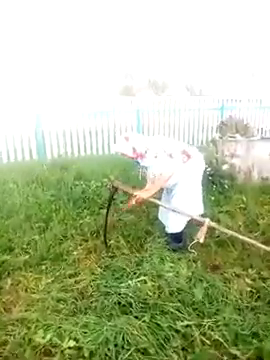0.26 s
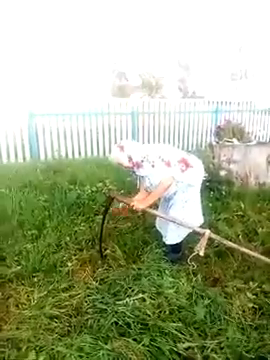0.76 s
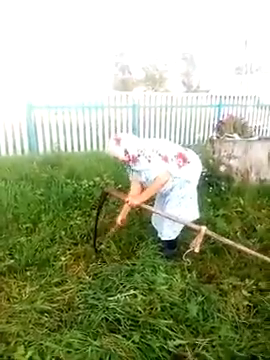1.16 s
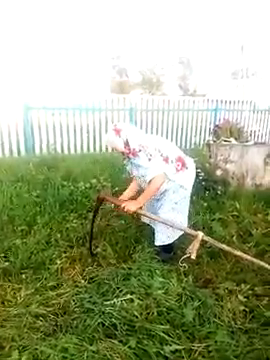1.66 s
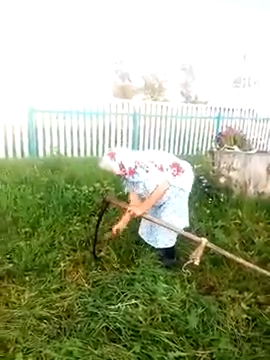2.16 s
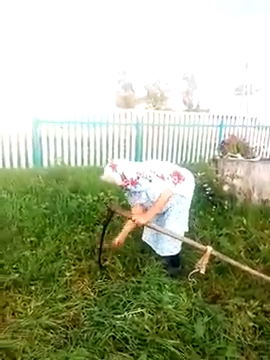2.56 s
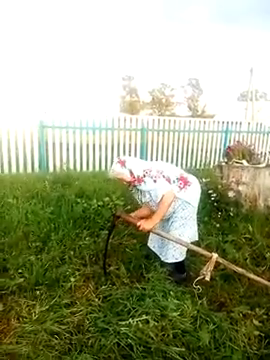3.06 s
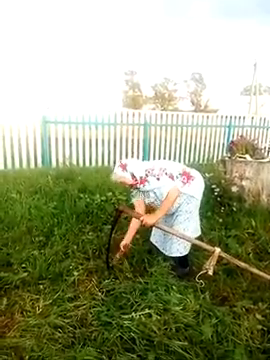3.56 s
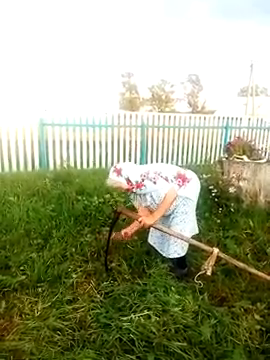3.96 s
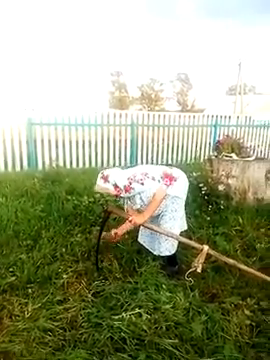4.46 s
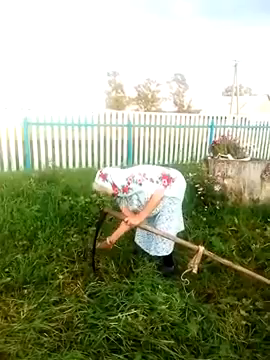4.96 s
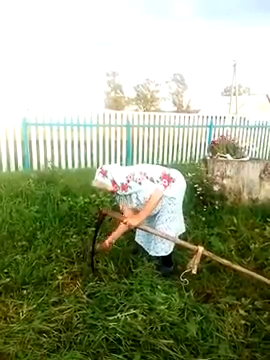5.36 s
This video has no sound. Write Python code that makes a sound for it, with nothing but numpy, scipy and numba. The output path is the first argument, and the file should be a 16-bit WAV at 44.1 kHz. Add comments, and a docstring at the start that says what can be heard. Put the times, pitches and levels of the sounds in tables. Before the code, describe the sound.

A whetstone sharpens a scythe blade in a quiet yard, a few metres away. From the very start, strokes come about every half second: the stone clacks onto the steel, sometimes bounces, then rasps along the edge with a gritty, slightly squeaky hiss and flicks off. The blade is damped by hand, so it rings only briefly. Stronger clacks land at about 1 and 2 seconds, and the loudest at 2.5. A few small dry knocks come around 1.3 seconds. The strokes continue, with clear clinks at about 3.1 and 4 seconds and a soft low thud near 4.5. After that the strikes are lighter and the scrapes follow more closely until the end at about 5.6 seconds. Faint dry rustles fill some gaps as the hand moves back. A low outdoor rumble and a soft distant wash lie underneath throughout.

```python
"""Honing a scythe

In a quiet yard, a few metres away, a whetstone clacks onto a scythe standing on its shaft, bounces,
then rasps along the edge and flicks off. Its grit rings the hand-damped blade, squeaks and hisses.
Between strokes come a faint rustle and the odd knock, over a low outdoor rumble and a distant wash."""
import sys
import numpy as np
from scipy import signal
from scipy.fft import rfft, irfft
from scipy.io import wavfile
from numba import njit

SR = 44100
rng = np.random.default_rng(int(sys.argv[2]) if len(sys.argv) > 2 else 0)


def transcribe(u):
    """Save the signal u as a 16-bit wav file named by the first command-line argument.

    u: samples, shape (n,) or (channels, n), limited to [-1, 1]; the rate is SR.
    q: integer samples, one column per channel.
    """
    v = np.clip(np.atleast_2d(u).T, -1, 1)
    q = np.round(v * 32767).astype(np.int16)
    wavfile.write(sys.argv[1], SR, q)


N = 247401
T = np.arange(N) / SR

# stone hits steel, and at 2.5635 s a faint repeat of the hit just before: (time [s], relative level [dB], main
# resonance [Hz], brightness [dB/octave], ring length [factor], shaft knock against the steel [dB])
STONE_HITS = [(0.001, -24, 2050, 3, 1.7, -16), (0.5195, -29, 1980, 3, 1.7, -11.5),
              (0.5452, -36, 1980, -2, 1.2, -13), (0.9797, -17.5, 2130, -2.5, 1.5, -20),
              (1.0223, -36, 2100, -3, 1.2, -22), (1.0445, -39, 2070, 7, 0.92, -20),
              (1.5055, -30, 1990, 0, 1.7, -14), (1.999, -15.6, 2090, .8, 1.07, -18),
              (2.5379, -11.2, 2087, 0, 0.91, -21.5), (2.5635, -30.5, 2100, 5, 1.1, -16),
              (3.13, -25.3, 1860, -5, 1, -10), (3.1491, -29.5, 2060, -7, 1.8, -19),
              (3.4235, -41, 2100, 6, 1.1, -18), (3.9913, -22, 2110, -5.5, 0.89, -22),
              (4.052, -33.5, 2100, 3, 1, -22), (4.5654, -29.5, 2110, -5, 1.5, -13.5),
              (5.4055, -38, 2080, 3, 1.4, -20)]
# stone drawn along the edge: (start [s], flick [s], rise [s], build-up to the flick [s], fall [s],
# time to full speed [s], base level [dB], boost at the flick [dB], hiss level [dB],
# relative grind [dB], brightness [dB/octave], main resonance [Hz])
STONE_STROKES = [(0.016, 0.179, .008, .008, .014, .18, -52.5, 9, -53, -23, .5, 2050),
                 (0.556, 0.6975, .07, .006, .015, .08, -47, 5.5, -62, -15, .3, 2000),
                 (1.018, 1.211, .02, .014, .013, .18, -53, 8, -56, -22, 1.2, 2060),
                 (1.521, 1.533, .006, .008, .01, .01, -54, 2, -65.5, -15, -1, 2000),
                 (1.565, 1.637, .035, .02, .024, .06, -41.5, 5.5, -55, -15, -.5, 2000),
                 (2.010, 2.179, .008, .012, .016, .09, -50, 6, -59, -16, 1.3, 2050),
                 (2.560, 2.775, .01, .012, .028, .05, -50, 4, -61, -18, .5, 2070),
                 (3.146, 3.179, .006, .008, .009, .01, -51, 3, -62, -12, -2, 2060),
                 (3.350, 3.611, .035, .035, .018, .055, -50, 5.5, -59.8, -14, .2, 2060),
                 (4.003, 4.2625, .02, .004, .052, .08, -52.5, 3.5, -61, -20, 0, 2080),
                 (4.575, 4.7545, .03, .008, .056, .1, -53, 5, -61, -24, -2.3, 2100),
                 (4.950, 5.032, .018, .03, .085, .06, -54, 5, -61.5, -18, 0, 2110),
                 (5.105, 5.216, .008, .05, .08, .02, -59, 11, -63, -19, -1.5, 2100),
                 (5.335, 5.597, .06, .006, .04, .1, -51.5, 1, -61, -21, -1.8, 2070)]
# blade damped by hand and stone: (nominal pitch [Hz], nominal width [Hz], level [dB])
DAMPED_MODES = [(1430, 150, -25), (1590, 70, -20.5), (1820, 70, -18), (2060, 135, .5), (2260, 180, -4.2),
                (2630, 150, -17), (3190, 200, -11), (3380, 80, -5.3), (3840, 160, -6.5), (4300, 150, -16.5),
                (4530, 70, -7), (4960, 200, -13.5), (5350, 170, -21.5), (6150, 200, -16),
                (6570, 150, -11.5), (7560, 260, -18), (8660, 380, -20), (9950, 380, -19), (11240, 380, -19),
                (11880, 260, -16), (14800, 800, -25)]
# blade ringing on after the stone leaves: (pitch [Hz], 60 dB decay [s], relative level [dB])
FREE_MODES = [(2085, .1, -24), (3376, .26, -14), (3844, .18, -16), (4527, .2, -13), (5100, .2, -18),
              (6578, .14, -17), (7637, .22, -15), (9374, .12, -15), (11957, .08, -14)]
# light brushing as the hand comes back: (middle [s], half length [s], level [dB])
HAND_BRUSHES = [(.74, .03, -58), (.848, .04, -54.5), (2.39, .07, -59.5), (2.94, .045, -58),
                (3.075, .02, -63), (3.22, .04, -62), (3.33, .06, -60), (3.93, .08, -63), (4.86, .035, -63)]
# small dry knocks: (time [s], peak level [dB], decay [s])
DRY_TICKS = [(1.2722, -28.5, .001), (1.2775, -40.5, .004), (1.318, -50, .004), (1.351, -51, .004)]
# soft low thuds: (time [s], level [dB], pitch [Hz], decay [s])
SOFT_THUDS = [(1.318, -45, 480, .005), (1.351, -46, 400, 0.0041), (4.463, -37, 190, 0.0042)]

# EQ curves, each (frequency [Hz], gain [dB])
AIR_EQ = [(15, -13), (35, -11.5), (58, -4), (68, -2.5), (76, 7.5), (86, 1), (100, .5), (160, -1.5),
          (300, -5.5), (480, -10), (800, -14.5), (1250, -19), (2000, -20), (2800, -21.5), (6500, -25),
          (15500, -28.5)]  # outdoor rumble and thin hiss
WASH_EQ = [(200, -17), (450, -2.5), (750, 1), (1000, -2), (1300, -9), (1900, -8), (3000, -16), (6000, -36)]  # distant midrange wash
CONTACT_EQ = [(1000, 0.5), (4500, -0.5), (6500, -4.5), (9000, -3), (15500, -7)]  # force of stone striking steel
RASP_EQ = [(300, -17), (700, -7), (1250, -7.5), (2000, 0), (2900, 0), (4000, -2), (5600, -2), (7000, -5.5),
           (9000, -7.5), (15500, -20.5)]  # broad scrape of grit
SHAFT_EQ = [(150, -12), (400, -5), (650, 0.5), (900, -6), (1150, 2), (1500, -7), (2200, -15.5), (5000, -25)]  # wooden body of the shaft
HISS_EQ = [(5000, -17), (7500, -3), (8900, 2), (9600, .5), (10100, 3), (10700, 0), (11400, 0), (11900, 4),
           (12400, -5), (13800, -1), (14150, 2), (14600, -4), (15200, -3), (15500, -6)]  # fine sizzle on the edge
GRIND_EQ = [(200, -9), (600, -1), (1050, -1), (1300, -4), (1600, 7), (1900, 2), (2600, 2), (5000, -20.5)]  # coarse, lower grinding
RUSTLE_EQ = [(600, -8), (1800, 1), (3000, -7), (6000, -2), (9000, 1.5), (11500, 3), (13500, -2),
             (15500, -4)]  # airy brush of the hand
TICK_EQ = [(100, -11), (500, -6), (900, 2), (1500, 1), (2300, -5), (3100, -19), (6000, -40)]  # small dry knock
MICROPHONE_EQ = [(20, 0), (6700, 0), (8000, -10.5), (13900, -10.5), (14600, -0.5), (15500, -1)]  # microphone with an upper-treble dip

BLADE_HZ = 2060  # the blade's main resonance, unbent


def undb(db):
    """Decibels to gain."""
    return 10 ** (np.asarray(db) / 20)


def unit(x):
    """Scale to rms 1."""
    return x / np.sqrt(np.mean(x ** 2))


def add(out, start_s, x):
    """Mix x into out at start_s."""
    i = max(int(start_s * SR), 0)
    out[i:i + len(x)] += x[:N - i]


def colour(x, curve, size=4096):
    """Minimum-phase EQ along a curve of (frequency [Hz], gain [dB])."""
    hz, db = np.transpose(curve)
    log_hz = np.log(np.fft.rfftfreq(size, 1 / SR) + 1)
    log_gain = np.log(undb(np.interp(log_hz, np.log(hz), db)))
    cepstrum = irfft(log_gain)[:size // 2]
    cepstrum[0] /= 2
    response = irfft(np.exp(rfft(2 * cepstrum, size)))
    return signal.fftconvolve(x, response)[:len(x)]


@njit
def resonate(x, hz, width_hz):
    """Sweepable band-pass, gain 1 at the centre."""
    y, band_state, low_state = np.empty(len(x)), 0., 0.
    for i in range(len(x)):
        g, damping = np.tan(np.pi * hz[i] / SR), width_hz / hz[i]
        band = (band_state + g * (x[i] - low_state)) / (1 + g * (g + damping))
        band_state, low_state = 2 * band - band_state, low_state + 2 * g * band
        y[i] = damping * band
    return y


def drift(rate_hz):
    """Random modulation with a spread near 1."""
    knots = np.arange(0, N / SR + 1, 1 / rate_hz)
    return np.interp(T, knots, rng.standard_normal(len(knots)))


def outdoor_air(wash_peak_s=.65, rise_db_per_s=8, fade_db_per_s=1.6):
    """A bed of rumble and even hiss; a distant wash swells, then slowly dies down."""
    rumble = undb(-56 + .36 * drift(3)) * unit(colour(rng.standard_normal(N), AIR_EQ, size=16384))
    swell_db = np.minimum(rise_db_per_s * (T - wash_peak_s), fade_db_per_s * (wash_peak_s - T))
    wash = undb(-60 + swell_db + .8 * drift(5)) * unit(colour(rng.standard_normal(N), WASH_EQ))
    return rumble + wash


def smeared_click(spread_s, size=4096, bands=36):
    """Bending waves of each pitch arrive at their own time, smearing a click over milliseconds."""
    hz = np.fft.rfftfreq(size, 1 / SR)
    delay_s = spread_s * np.interp(hz, np.linspace(0, SR / 2, bands), rng.uniform(.16, 1, bands))
    return irfft(np.exp(-2j * np.pi * np.cumsum(delay_s) * SR / size))


def blade(force, main_hz, tilt_db, ring, flutter_db=0):
    """Steel modes of alternating sign: contact bends the low ones most; sliding makes each flutter."""
    out = 0
    for k, (hz, width_hz, db) in enumerate(DAMPED_MODES):
        bend = (main_hz / BLADE_HZ) ** (1 if hz < BLADE_HZ * np.sqrt(2) else .15)
        gain = undb(db + tilt_db * np.log2(hz / BLADE_HZ))
        push = force * undb(flutter_db * drift(60)) if flutter_db else force
        out += (-1) ** k * gain * resonate(push, hz * bend * np.ones(len(force)), width_hz / ring)
    return out


def clacks(hits, smear_s=.0019, chatter_s=.0032, crack_s=.0053, shaft_s=.0093):
    """A sharp blow and brief chatter ring the steel; the wooden shaft answers with a dull knock."""
    out = np.zeros(N)
    for time_s, db, main_hz, tilt_db, ring, shaft_db in hits:
        blow = smeared_click(smear_s * ring)  # a loosely held blade smears the blow more
        t, noise = T[:len(blow)], rng.standard_normal((3, len(blow)))
        chatter = noise[0] * t * np.exp(-t / chatter_s)
        # a stone already sliding tears over the steel rather than striking it
        sliding = any(start < time_s <= flick for start, flick, *_ in STONE_STROKES)
        chatter *= (1.3 if sliding else .35) / np.linalg.norm(chatter)
        force = colour(blow + chatter, CONTACT_EQ)
        steel = unit(blade(force, main_hz, tilt_db, ring))
        crack = unit(colour(noise[1] * np.exp(-t / crack_s), RASP_EQ))
        shaft = unit(colour(noise[2] * np.exp(-t / shaft_s), SHAFT_EQ))
        add(out, time_s, undb(db - 21) * (steel + undb(-19) * crack + undb(shaft_db) * shaft))
    return out


def free_ring(steel):
    """Away from the hand, the blade rings on faintly at a few pitches."""
    return sum(undb(db + 6) * resonate(steel, np.full(N, float(hz)), np.log(1000) / np.pi / t60_s)
               for hz, t60_s, db in FREE_MODES)


def yard_reverb(x, t60_s=.28, tail_db=-18, echo_s=.0275, echo_spread_s=.0034, echo_db=-21):
    """The yard returns a thin diffuse tail and a weak scattered slap."""
    t = T[:SR // 2]
    tail = rng.standard_normal(len(t)) * np.exp(-np.log(1000) * t / t60_s)
    echo = rng.standard_normal(len(t)) * np.exp(-np.abs(t - echo_s) / echo_spread_s)
    response = undb(tail_db) * tail / np.linalg.norm(tail) + undb(echo_db) * echo / np.linalg.norm(echo)
    return signal.fftconvolve(x, response)[:N]


def hand_motion(bite_db=3.5, bite_s=.03, waver_db=.8):
    """Stroke envelopes: the stone bites as it settles, speeds up, presses into the flick and lifts."""
    strokes = np.array(STONE_STROKES)
    current = np.maximum(np.searchsorted(strokes[:, 0], T) - 1, 0)
    (start, flick, rise_s, build_s, fall_s, speedup_s,
     db, flick_db, hiss_db, grind_db, tilt_db, main_hz) = strokes[current].T
    age = np.maximum(T - start, 0)
    contact = np.minimum(age / rise_s, 1) * np.exp(-(np.maximum(T - flick, 0) / fall_s) ** 2)
    settle_db = bite_db * np.exp(-age / bite_s)
    push_db = flick_db * np.exp(np.minimum(T - flick, 0) / build_s)
    pressure = contact * undb(db + settle_db + push_db + waver_db * drift(35))
    # a slow stone hisses less and leaves the main resonance higher
    slowness = np.maximum(1 - age / speedup_s, 0)
    hiss_gain = contact * undb(hiss_db + 9 - 15 * slowness)
    return pressure, hiss_gain, main_hz + 60 * slowness, grind_db, tilt_db


def grit(per_s, spread_db):
    """Random tiny impacts, a few much larger than the rest."""
    struck = rng.random(N) < per_s / SR
    size = undb(spread_db * np.minimum(rng.exponential(size=N), 5))
    return unit(struck * size * rng.choice([-1, 1], N))


def squeaks(count=420, centre_hz=4800, pitch_spread=.427, width_s=.0037, glide_per_s=7):
    """Grit sticks and slips for a moment: tiny chirps that glide up or down."""
    out, t = np.zeros(N), T[:SR // 25] - .02
    times = rng.random(count) * N / SR
    for time_s, (pitch, slope, size) in zip(times, rng.standard_normal((count, 3))):
        hz = min(centre_hz * np.exp(pitch_spread * pitch), SR / 3)
        chirp = np.sin(2 * np.pi * hz * (t + glide_per_s * slope * t ** 2 / 2))
        add(out, time_s, undb(2 * size) * chirp * np.exp(-(t / width_s) ** 2 / 2))
    return unit(out)


def honing():
    """Grit catches unevenly on the edge: it rings the blade, rasps, squeaks, grinds and hisses."""
    pressure, hiss_gain, main_hz, grind_db, tilt_db = hand_motion()
    catch = undb(1.7 * drift(190))
    force = grit(per_s=7000, spread_db=2) * catch
    wobbling_hz = main_hz * (1 + .013 * drift(45))
    steel = blade(force, wobbling_hz, tilt_db, ring=1.55, flutter_db=4.8)
    steel = unit(steel * undb(-.55 * tilt_db))  # evens out the ring of bright and dull strokes
    rasp = unit(colour(grit(per_s=5000, spread_db=3) * catch, RASP_EQ))
    hiss = unit(colour(grit(per_s=6000, spread_db=2.6) * catch, HISS_EQ))
    grind = unit(colour(grit(per_s=4000, spread_db=1) * catch, GRIND_EQ))
    scrape = undb(.4 * tilt_db) * (undb(-8.5) * rasp + undb(-12) * squeaks())
    return pressure * (undb(-1.2) * steel + scrape + undb(grind_db) * grind) + hiss_gain * hiss


def snags(boost_db=10, ring=1.6, shaft_db=-13):
    """The stone catches at each flick, in proportion to its pressure; rows like STONE_HITS."""
    return [(flick, db + flick_db + boost_db, main_hz, tilt_db + 1, ring, shaft_db)
            for _, flick, *_, db, flick_db, _, _, tilt_db, main_hz in STONE_STROKES]


def brushing():
    """A faint dry rustle swells and fades as the hand returns."""
    swell = sum(undb(db) * np.exp(-((T - mid_s) / half_s) ** 2) for mid_s, half_s, db in HAND_BRUSHES)
    return swell * unit(colour(grit(per_s=5500, spread_db=2.5), RUSTLE_EQ))


def knocks():
    """Dry ticks and dull thuds of things shifting."""
    out, t = np.zeros(N), T[:SR // 10]
    for time_s, db, decay_s in DRY_TICKS:
        tick = colour(rng.standard_normal(len(t)) * np.exp(-t / decay_s), TICK_EQ)
        add(out, time_s, undb(db) * tick / np.abs(tick).max())
    for time_s, db, hz, decay_s in SOFT_THUDS:
        add(out, time_s, undb(db) * np.sin(2 * np.pi * hz * t) * np.exp(-t / decay_s))
    return out


def scene():
    """Mono mix: work on the blade up front, its tail in the yard, open air behind."""
    steel = honing() + clacks(STONE_HITS + snags())
    foreground = steel + free_ring(steel) + knocks() + brushing()
    return (foreground + yard_reverb(foreground) + outdoor_air())[None]


def record(dry):
    """The microphone scoops the upper treble; a steep low-pass cuts the very top."""
    coloured = np.array([colour(channel, MICROPHONE_EQ) for channel in dry])
    return signal.sosfilt(signal.ellip(10, .2, 70, 15650, fs=SR, output="sos"), coloured)


dry = scene()
out = record(dry)
transcribe(out)
```